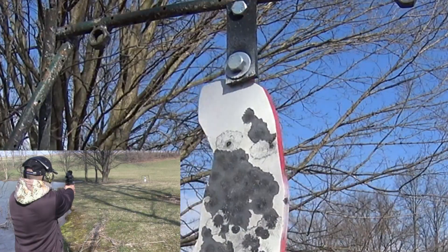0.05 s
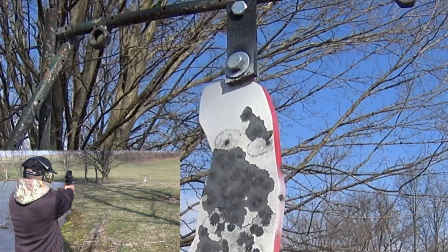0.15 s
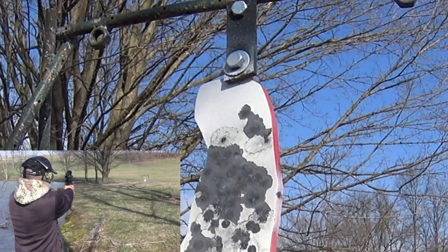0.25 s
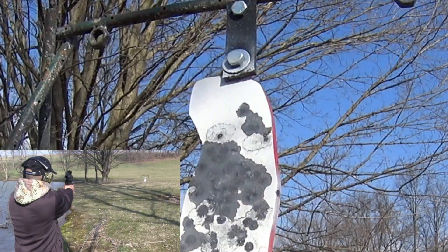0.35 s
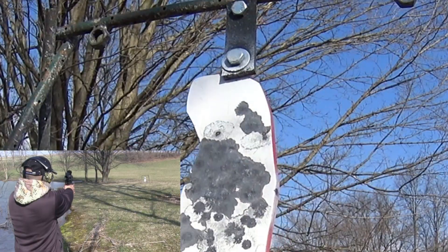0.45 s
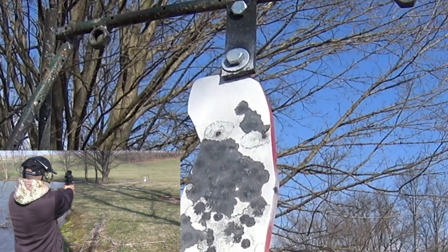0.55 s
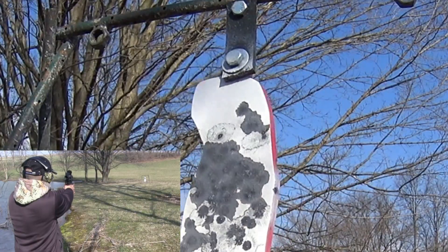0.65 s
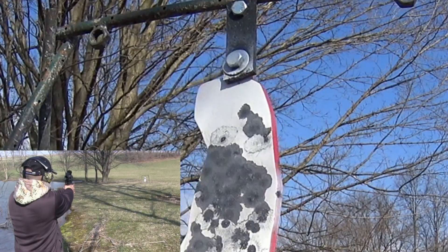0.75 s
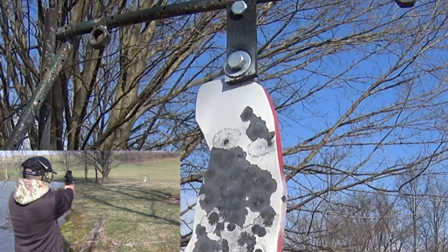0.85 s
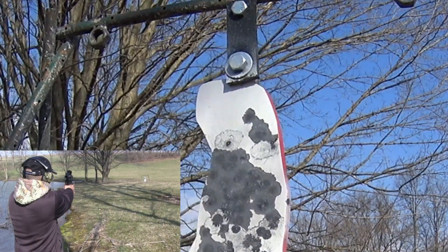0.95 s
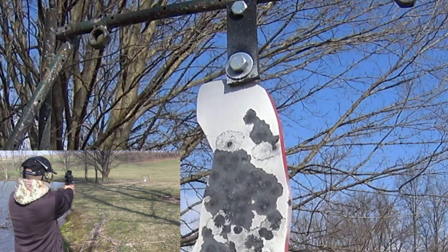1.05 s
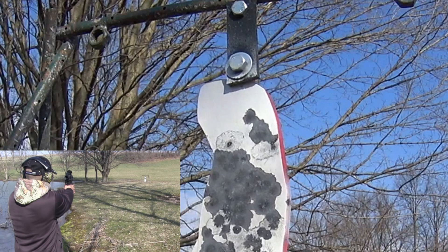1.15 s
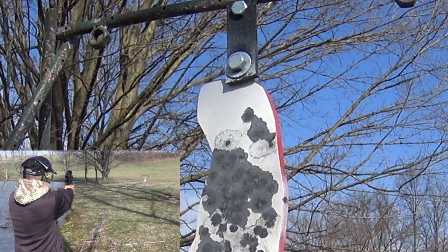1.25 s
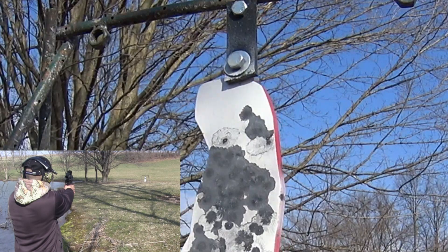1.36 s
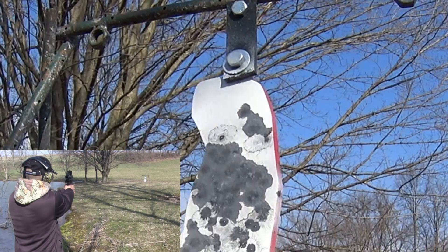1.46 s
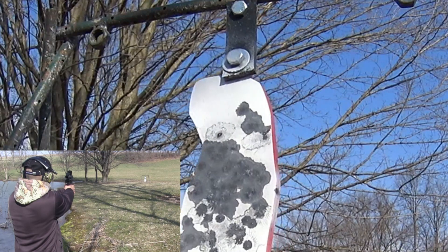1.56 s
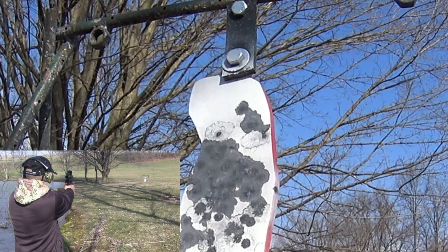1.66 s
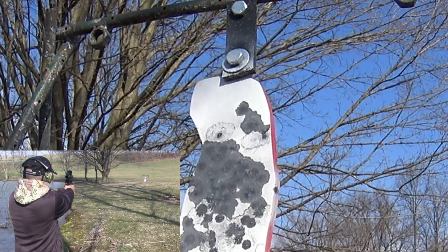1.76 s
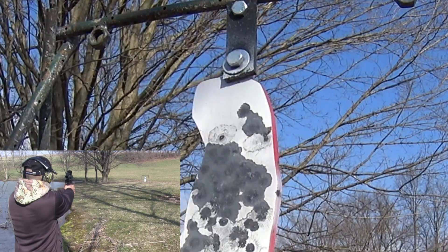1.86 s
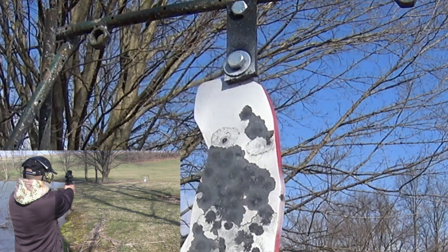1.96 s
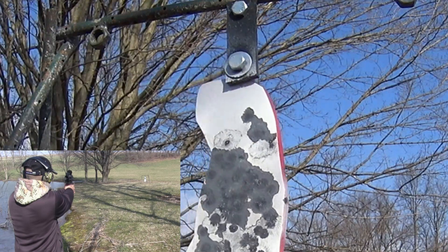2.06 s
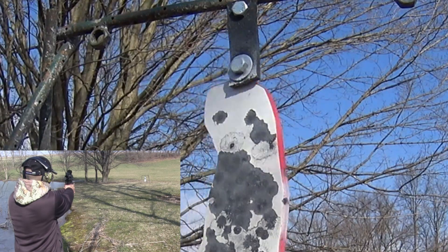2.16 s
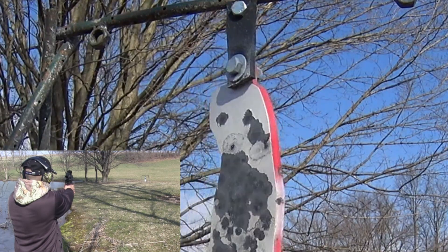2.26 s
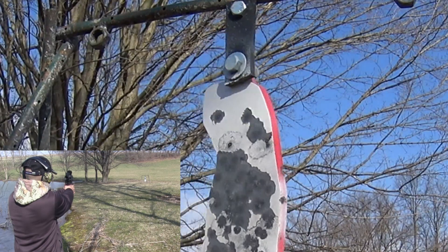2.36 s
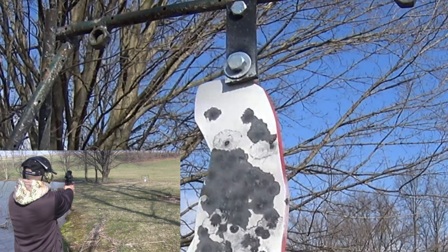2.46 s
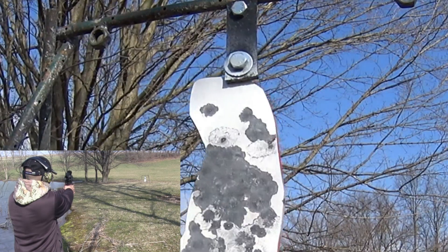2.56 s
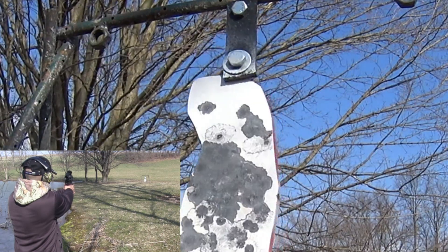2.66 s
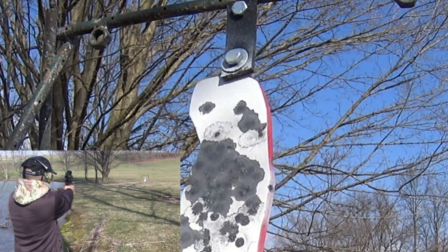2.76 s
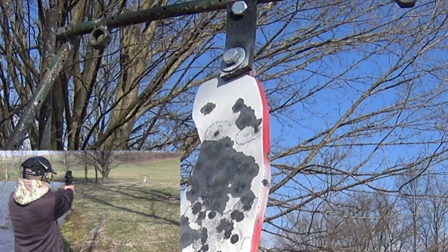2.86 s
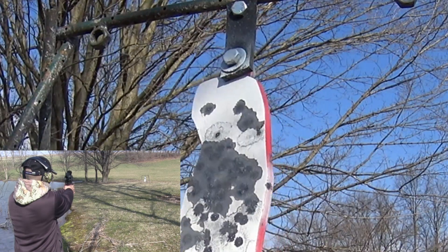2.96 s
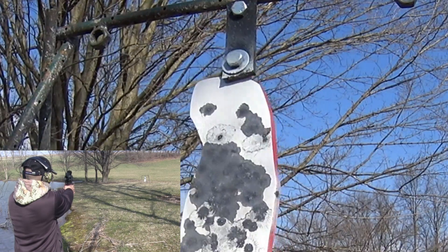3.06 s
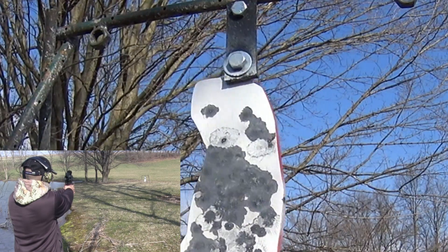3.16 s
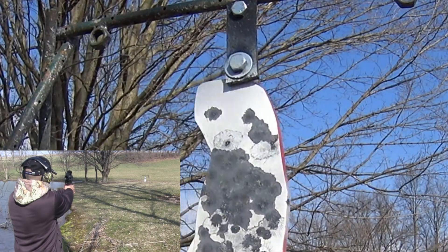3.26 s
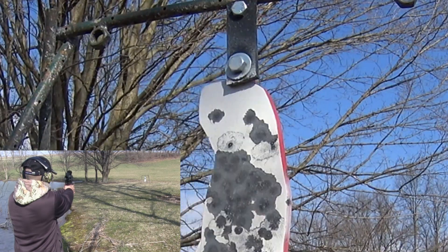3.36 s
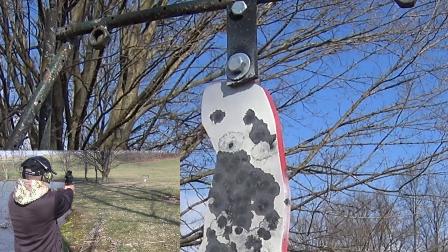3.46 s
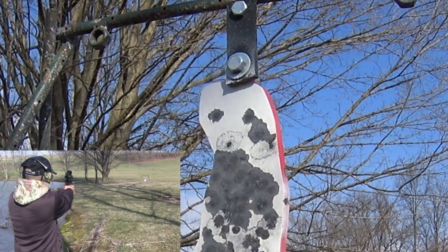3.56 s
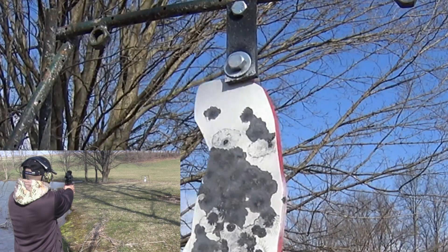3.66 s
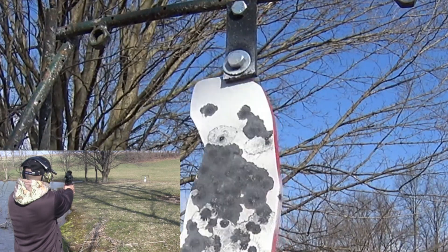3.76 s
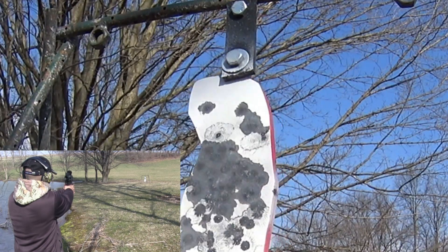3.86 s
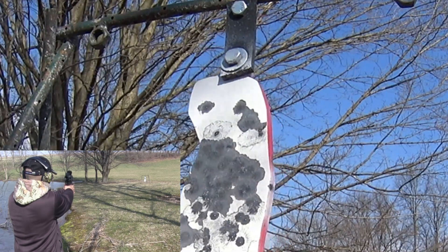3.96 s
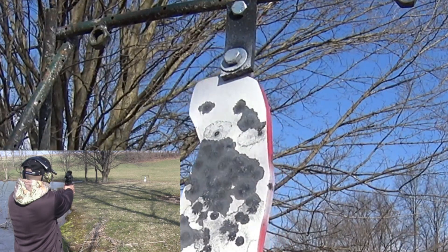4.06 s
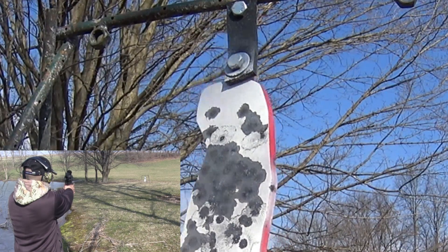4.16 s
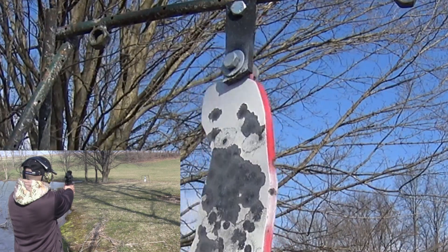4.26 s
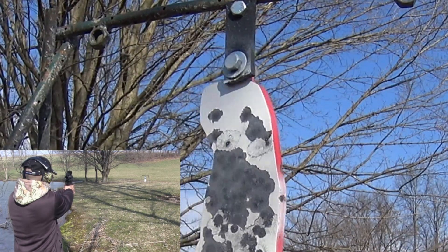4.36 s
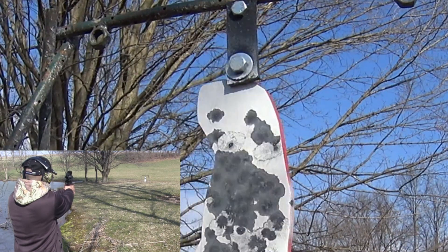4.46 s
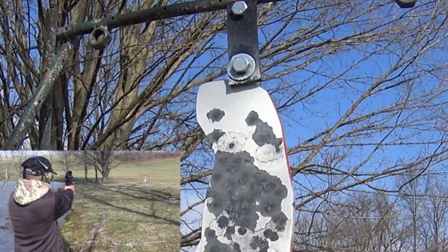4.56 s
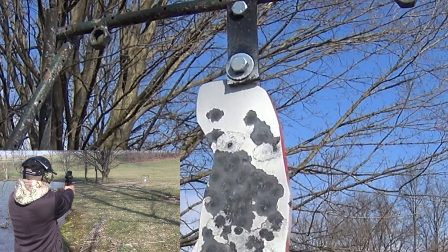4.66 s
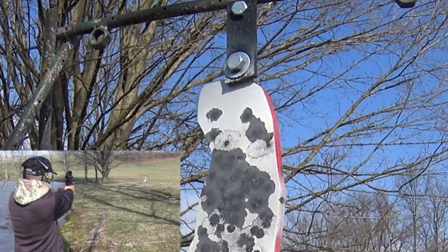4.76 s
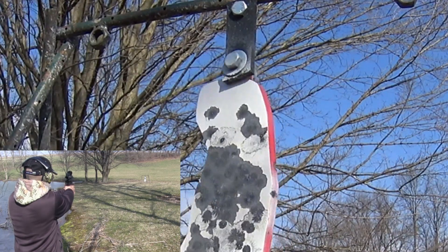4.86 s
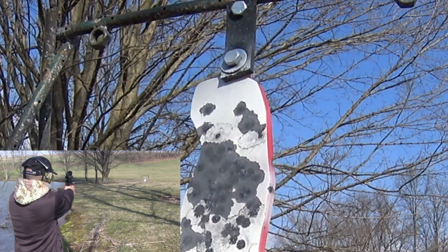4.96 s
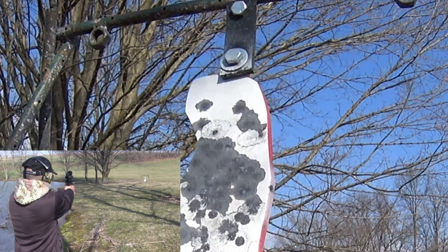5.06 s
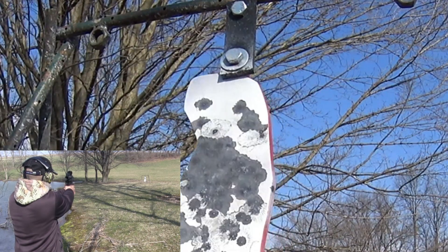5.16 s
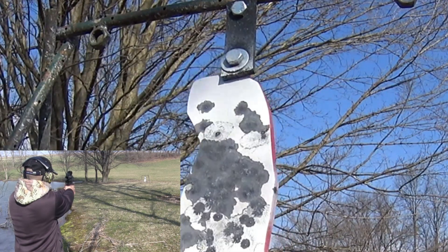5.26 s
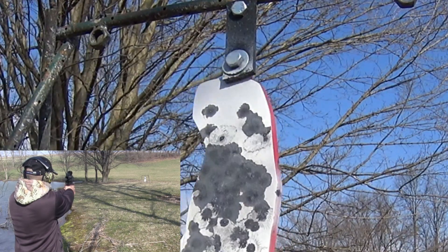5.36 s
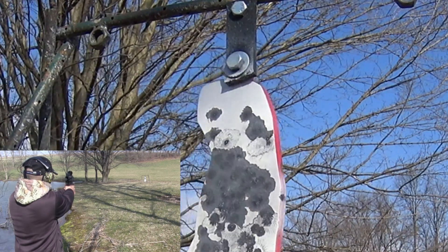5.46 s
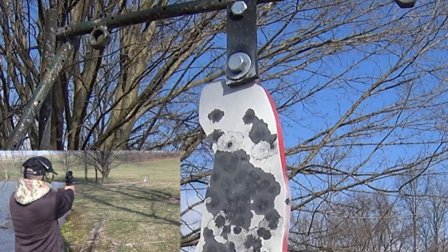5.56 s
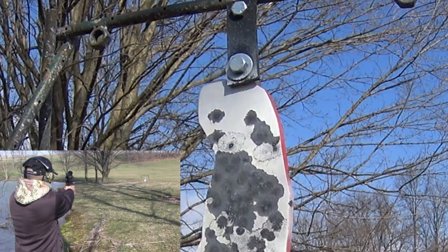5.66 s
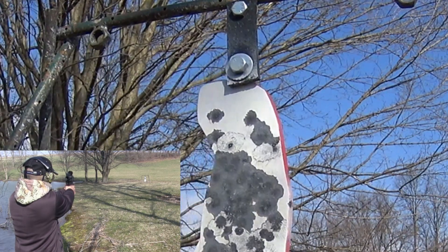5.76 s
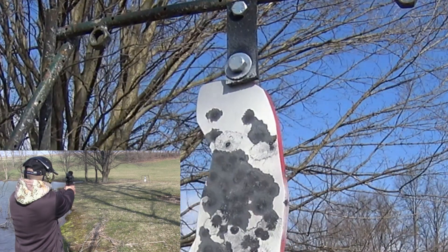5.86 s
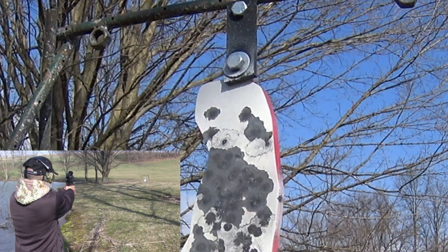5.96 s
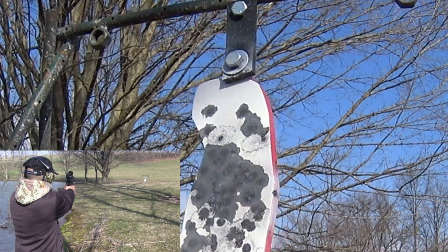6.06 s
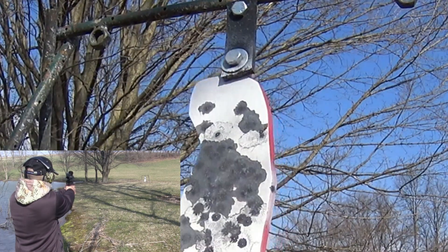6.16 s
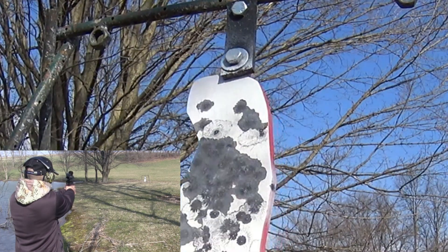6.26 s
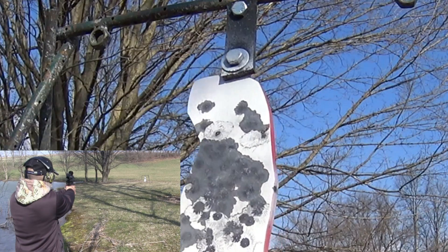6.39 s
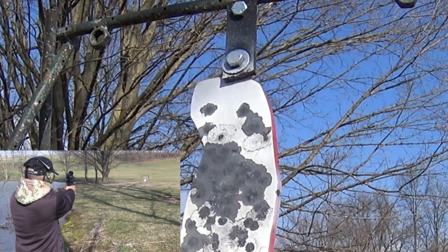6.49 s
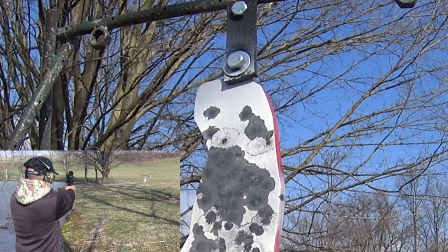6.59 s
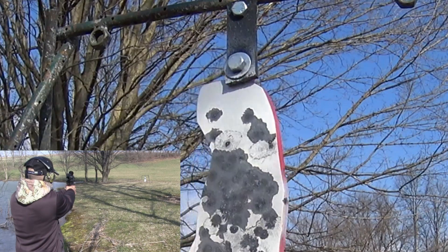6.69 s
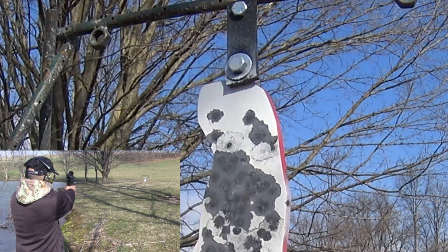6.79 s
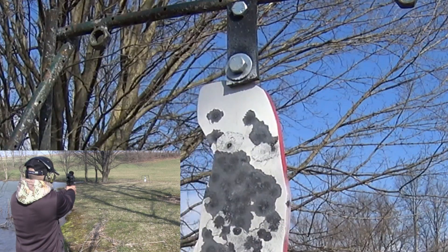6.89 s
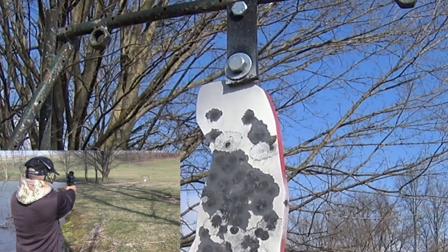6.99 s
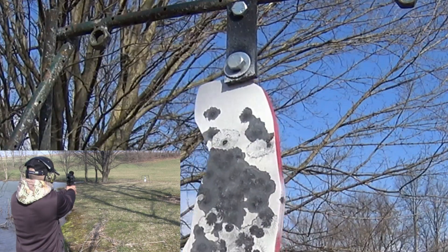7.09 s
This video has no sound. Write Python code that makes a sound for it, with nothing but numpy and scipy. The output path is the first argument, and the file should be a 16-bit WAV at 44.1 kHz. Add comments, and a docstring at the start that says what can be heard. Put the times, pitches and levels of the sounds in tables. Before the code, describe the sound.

Outdoors at a field edged by woods, a pistol shot is already ringing out on steel. Two more sharp cracks follow about two seconds apart, each with an almost immediate bright lead splat and short metallic ring, close to one microphone, plus a fainter late smack at the shooter. Echo washes back from trees. Quiet hush, a tiny bird chirp, then wind buffeting and cloth rustles near the end.

```python
"""Pistol shots at a hanging steel plate

A small-calibre pistol is fired at a steel plate across a field; the first shot is already ringing out.
A microphone at the plate hears the smack (shaped noise) and the ring (decaying modes), which swells as its
gain recovers and wavers as the plate twists. One at the shooter hears the blast, the late smack and the echo
of the woods, all bursts of shaped noise, with gusts of wind, a rustle of clothing, a bird and hissing twigs."""
import sys
import numpy as np
from scipy import signal
from scipy.fft import rfft, irfft, next_fast_len
from scipy.io import wavfile
from scipy.ndimage import uniform_filter1d

SR = 44100
rng = np.random.default_rng(int(sys.argv[2]) if len(sys.argv) > 2 else 0)


def dump(signal):
    """Clip the signal to [-1, 1] and save it as 16-bit WAV at the path in sys.argv[1]."""
    limited = np.clip(np.atleast_2d(signal).T, -1, 1)
    pcm = np.round(limited * 32767).astype(np.int16)
    wavfile.write(sys.argv[1], SR, pcm)


N = 314433
TIME = np.arange(N) / SR  # seconds from the start of the scene
AGE = TIME[:2 * SR]  # seconds from the start of one event

# Spectra have the columns hz, density_db (per Hz, relative); levels are those before gain control.
# shots: muzzle_s, blast_db, thump_db, wood_echo_db, impact_s, impact_db, shimmer_db,
# smack_s (arrival at the shooter), smack_db, bite_db (relative to the smack), far_ring_db
SHOTS = [(-.062, -8, -25, -42, -.04, -6, -35, .08, -45, -8, -66),
         (2.1864, 1.5, -24, -42.5, 2.2115, -9, -29, 2.3235, -17, -13, -44),
         (4.2019, 5.5, -7, -39.5, 4.2235, -5.5, -22, 4.3409, -12, -3, -34.5)]
# spectra of the blast, its scatter off the ground and its low thump: hz, density_db
BLAST_SPECTRUM = [(40, -30), (250, -22), (600, -22), (1300, -11), (2600, 1), (3600, -6), (6000, -16),
                  (15000, -30)]
GROUND_SPECTRUM = [(40, -32), (220, -21), (600, -21), (1600, -4), (2600, 0), (5000, -6), (9000, -11),
                   (15000, -16)]
THUMP_SPECTRUM = [(20, -36), (70, -24), (220, -5), (520, 0), (720, -7), (1100, -8), (1700, -9), (4000, -34)]
# spectra of the smack at the shooter and of its bright bite of lead on steel: hz, density_db
SMACK_SPECTRUM = [(200, -24), (1000, -19), (1800, -6), (2450, 0), (3200, -15), (7200, -17), (15000, -20)]
BITE_SPECTRUM = [(3900, -30), (4900, -4), (5700, 0), (7000, -28)]
# spectrum of the plate's ring as it reaches the shooter: hz, density_db
FAR_RING_SPECTRUM = [(300, -26), (1100, -8), (2400, 0), (5500, -5), (8000, -14), (11500, -19), (13500, -20),
                     (16000, -31)]
# the plate's highest modes, heard at the shooter: pitch_hz, peak_db (relative to the far ring)
HIGH_MODES = [(9790, -19), (10550, -18), (11500, -17), (13400, -16)]
# spectrum of the echo of the woods: hz, density_db
WOODS_SPECTRUM = [(200, -34), (600, -21), (1300, -3), (2400, 0), (3700, -5), (5700, -11), (8500, -19),
                  (14000, -32)]
# broad stands of trees and the gaps between them: echo_delay_s, level_db (over the scatter)
STANDS = [(.14, 3), (.28, 2.5), (.385, -4), (.44, 3), (.53, -3), (.58, 5.5), (.635, 3.5), (.705, 5.5),
          (.775, 6), (.9, 5.5), (1.04, 7.5), (1.14, 6)]
# spectra at the plate of the passing report, the lead splash and the weak modes: hz, density_db
CRACK_SPECTRUM = [(200, -14), (1000, -6), (2800, 0), (5000, -6), (8500, -8), (12500, -2), (16000, -6)]
SPLASH_SPECTRUM = [(150, -14), (700, -10), (2000, -2), (5000, 0), (7500, -3), (10000, -10), (15000, -17)]
SHIMMER_SPECTRUM = [(300, -26), (1100, -7), (2400, 0), (4000, -3), (5500, -4), (8000, -11), (11500, -17),
                    (15000, -29)]
# plate modes: pitch_hz, t60_s, rest_lobe_phase_rad, port_phase_rad (between the two ports),
# left_minus_right_db, hit_1_db, hit_2_db, hit_3_db
PLATE_MODES = [(815, 1.65, .8, .3, 0, -46, -41.5, -44), (3293, .52, 1.63, 1.4, -5, -17.5, -9, 4),
               (3869, .62, 1.87, .2, -1, -24, -35, -1), (4868, .34, 2.47, .5, -2, -39, -14, -17),
               (5375, .1, .21, .6, 0, -12, -13, -9), (6313, .1, 1.44, .6, 0, -12, 3, -6),
               (7099, .09, .11, .7, 0, -12, -7, -9), (7643, .7, 1.85, .62, -1, -24, -12.3, -7),
               (9269, .23, 2.4, 1.6, 0, -33, -12, -26)]
# the plate's twist after each hit: size_rad_per_khz (of lobe phase), rate_hz, start_angle_rad,
# lean_rad_per_khz, fill_ratio (share of the ring left between lobes)
TWISTS = [(.364, .678, -.4, -.668, .08), (.45, 1.44, -.09, 0, .08), (.08, 3.09, 2.62, 0, .1)]
# the breeze at the microphone: time_s, buffet_db (low), flutter_db (brighter)
BREEZE = [(0, -82, -85), (.35, -72, -74), (1.36, -82, -90), (1.49, -64, -86), (2.5, -59.5, -82),
          (3.1, -57, -71), (4.1, -54, -65), (4.45, -60, -55), (4.85, -61, -59), (5.05, -45, -55),
          (5.3, -42, -44), (5.48, -52, -64), (5.85, -48, -58), (6.06, -41, -49), (6.21, -53, -59),
          (6.4, -47, -56), (6.57, -58, -68), (7.13, -60, -56)]
# single gusts: peak_s, length_s, buffet_db, rumble_db
GUSTS = [(1.255, .05, -61, -57), (1.56, .16, -59, -57), (1.71, .18, -61, -60), (1.865, .11, -57, -61),
         (2.13, .12, -57, -55), (2.81, .08, -58, -56), (3.22, .1, -53, -60), (3.605, .04, -51, -66),
         (5.22, .11, -41, -64), (5.385, .04, -35, -58), (5.525, .07, -52, -47), (6.005, .13, -35.5, -54),
         (6.316, .09, -37, -62)]
# spectra of low buffeting, brighter flutter and the slow push of the wind: hz, density_db
BUFFET_SPECTRUM = [(15, -58), (25, -50), (80, -23), (130, -5), (200, 0), (300, -2.5), (420, -13),
                   (650, -30), (1500, -43), (4000, -64)]
FLUTTER_SPECTRUM = [(20, -40), (150, -15), (410, 0), (520, -3), (650, -10), (780, -10), (1400, -17),
                    (2600, -28), (5000, -54)]
RUMBLE_SPECTRUM = [(15, -42), (25, -30), (45, -10), (75, 0), (110, 1), (200, -15), (500, -40), (2000, -62)]
# eddies that strike the ports squarely: start_s, peak_db
KICKS = [(3.445, -38), (5.185, -31), (5.213, -27), (5.301, -28), (5.339, -22), (5.39, -24), (5.6, -33),
         (5.635, -32), (5.803, -31), (5.923, -27), (5.961, -27), (5.98, -25), (6.003, -19), (6.018, -20),
         (6.138, -26), (6.259, -35), (6.313, -24), (6.33, -22)]
# spectrum of the thud of one such eddy: hz, density_db
KICK_SPECTRUM = [(20, -62), (150, -11), (240, 0), (380, -4), (520, -7), (700, -25), (1600, -36),
                 (4000, -62)]
# catches of cloth and brief flutters of wind: start_s, length_s, level_db (before a 4 dB trim), brightest_hz
RUSTLES = [(.958, .02, -58, 2900), (2.114, .006, -54, 1000), (5.335, .007, -42, 1200),
           (5.928, .008, -53, 2900), (6.138, .014, -53, 2500), (6.308, .013, -45.5, 2650),
           (6.472, .018, -49, 1400), (6.601, .04, -52, 1500), (6.683, .006, -49, 1100),
           (6.749, .028, -44, 1800), (6.804, .053, -40, 2550), (6.78, .35, -52, 1600),
           (6.963, .005, -43.5, 3500), (6.972, .009, -49, 3200), (6.966, .016, -40.5, 950),
           (7.025, .012, -39, 900), (7.027, .018, -50, 3100)]
# a distant bird: start_s, pitch_hz (at the start), level_db (before a 2 dB trim)
CHIRPS = [(1.67, 4250, -70), (3.48, 4300, -69), (6.51, 4350, -68)]
# breeze in dry twigs and grass: time_s, level_db (before a 2 dB trim)
TWIG_LEVELS = [(0, -76), (3.4, -75), (4.8, -68), (5.35, -61), (5.9, -63), (6.5, -61), (7.13, -62)]
# spectra of the twigs and of the outdoor hush: hz, density_db
TWIG_SPECTRUM = [(500, -5), (2000, 2), (5500, 0), (10000, -5), (13000, -2), (16000, -5)]
HUSH_SPECTRUM = [(25, -2), (140, -1), (330, -13), (1000, -2), (2000, -4), (3500, -9), (6000, -15),
                 (10000, -20), (13000, -18), (16000, -20)]

GROUND_DB, GROUND_T60_S = -17, .12  # blast scattered by the ground, relative to the blast
STAND_SPREAD_S = .021  # how long one stand of trees echoes
EDDY_PER_S, EDDY_DB = 70, 2.2  # quick unevenness of the wind
GUST_FLUTTER_DB, FLUTTER_GROWTH = 8, 1.5  # flutter of a full-scale gust; dB gained per dB of buffeting
RUMBLE_DB, RUMBLE_GROWTH = -53, .27  # the same for the rumble of the breeze
RUSTLE_ATTACK_S, RUSTLE_RELEASE_S = .002, .005  # each starts quickly and lets go a little slower
CRACKLE_PER_S, CRACKLE_DB = 700, 3.5  # crackly unevenness within each rustle or flutter
BODY_LOSS_DB, BODY_S = -14, .018  # brief ones lack the low body of longer rustles
LIMIT_DB, RECOVER_S, CEILING_DB = -13, .09, -9  # gain control and overload of the shooter's microphone
COPY_DELAY_S = .003775
TOP_HZ = 16500


def gunfire():
    """Impulse, scattering and delay: blast and thump, ground and woods, then the hit a field's width later."""
    out = np.zeros((2, N))
    for muzzle_s, blast_db, thump_db, echo_db, *_, smack_s, smack_db, bite_db, ring_db in SHOTS:
        blast = snap(BLAST_SPECTRUM, t60=.017, side_db=-28)
        ground = undb(GROUND_DB) * burst(GROUND_SPECTRUM, t60=GROUND_T60_S, side_db=-20)
        add(out, muzzle_s, undb(blast_db) * (blast + ground))
        add(out, muzzle_s, undb(thump_db) * snap(THUMP_SPECTRUM, t60=.045, side_db=-26))
        add(out, muzzle_s, undb(echo_db) * wood_echo())
        smack = snap(SMACK_SPECTRUM, t60=.009, side_db=-18)
        bite = undb(bite_db) * snap(BITE_SPECTRUM, t60=.009, side_db=-18)
        add(out, smack_s, undb(smack_db) * (smack + bite))
        add(out, smack_s, undb(ring_db) * far_ring())
    return out


def far_ring():
    """Modal density: across the field the plate is a dense shimmer topped by a few thin partials."""
    partials = 0
    for hz, db in HIGH_MODES:
        partials = partials + undb(db) * np.sin(2 * np.pi * (hz * AGE + rng.random()))
    return burst(FAR_RING_SPECTRUM, t60=.7, side_db=-10) + partials * fade(.6)


def wood_echo():
    """Scattering and absorption: trunks return uneven clumps, and longer air paths take more treble."""
    clumps_db = sum(db * np.exp(-((AGE - delay) / STAND_SPREAD_S) ** 2) for delay, db in STANDS)
    uneven_db = 1.6 * walk(110, len(AGE)) + 2.2 * walk(900, len(AGE))
    scatter = wide(WOODS_SPECTRUM, len(AGE), side_db=-10) * undb(clumps_db + uneven_db)
    hz, s, bands = signal.stft(scatter, SR, nperseg=2 ** 8)
    loss_db = s * (11 + .004 * hz[:, None]) + 3.3 * s ** 2
    echo = signal.istft(bands * undb(-loss_db), SR)[1][:, :len(AGE)]
    return echo * (1 - np.exp(-AGE / .13))  # the echo builds up gradually


def at_the_plate():
    """Impact excitation: the report cracks past, then lead splashes on the steel and sets it ringing."""
    out = np.zeros((2, N))
    for hit, (muzzle_s, _, _, _, impact_s, impact_db, shimmer_db, *_) in enumerate(SHOTS):
        crack = undb(-17.5) * snap(CRACK_SPECTRUM, t60=.012, side_db=-18)
        crack_tail = undb(-26) * burst(CRACK_SPECTRUM, t60=.16, side_db=-15)
        add(out, muzzle_s + .004, crack + crack_tail)
        splash = undb(impact_db) * burst(SPLASH_SPECTRUM, t60=.1, side_db=-10)
        # the plate's many weak modes
        shimmer = undb(shimmer_db) * burst(SHIMMER_SPECTRUM, t60=.6, side_db=-5)
        struck = splash + shimmer + plate_ring(hit)
        add(out, impact_s, undb(5.3) * gain_control(struck, limit_db=-28, recover_s=.22))
    return out


def plate_ring(hit):
    """Modal directivity: modes beam in lobes, finer with pitch; twisting sweeps them past the microphone."""
    size, rate, start, lean, fill = TWISTS[hit]
    twist = lean + size * np.sin(2 * np.pi * rate * AGE + start) * np.exp(-AGE / 1.5)
    ring = 0
    for hz, t60, rest, port, pan_db, *hit_db in PLATE_MODES:
        lobe = hz / 1000 * twist + rest
        beam = np.cos(lobe) + fill * 1j * np.sin(lobe)  # the nulls between lobes are never quite empty
        vibration = np.exp(2j * np.pi * (hz * AGE + rng.random())) * fade(t60)
        wave = beam * vibration * undb(hit_db[hit])
        port_gain = undb(np.array([[pan_db], [-pan_db]]) / 2)
        ports = port_gain * np.exp(1j * np.array([[0], [port]]))
        ring = ring + np.sqrt(2) * np.real(ports * wave)
    return ring * (1 - np.exp(-AGE / .006))


def wind():
    """Turbulence: eddies buffet the ports over a rumble that grows with the breeze; strong gusts flutter."""
    times, buffet_db, flutter_db = np.transpose(BREEZE)
    breeze = undb(np.interp(TIME, times, buffet_db))
    breeze_flutter = undb(np.interp(TIME, times, flutter_db))
    gusts, push = np.zeros(N), np.zeros(N)
    for s, length, db, rumble_db in GUSTS:
        add(gusts, s - length / 2, undb(db) * swell(length))
        add(push, s - length / 2, undb(rumble_db) * swell(length))
    eddies = undb(EDDY_DB * walk(EDDY_PER_S, N))
    buffet = eddies * np.hypot(breeze, gusts)
    gust_flutter = undb(GUST_FLUTTER_DB) * gusts ** FLUTTER_GROWTH
    flutter = eddies * np.hypot(breeze_flutter, gust_flutter)
    breeze_rumble = undb(RUMBLE_DB + 2.5 * walk(16, N)) * breeze ** RUMBLE_GROWTH
    rumble = np.hypot(breeze_rumble, push)
    return (buffet * wide(BUFFET_SPECTRUM, N, side_db=-24)
            + flutter * wide(FLUTTER_SPECTRUM, N, side_db=-20)
            + rumble * wide(RUMBLE_SPECTRUM, N, side_db=-14))


def kicks():
    """Impulse response: the hardest eddies land as single thuds."""
    out, thud = np.zeros(N), click(KICK_SPECTRUM)
    for s, db in KICKS:
        add(out, s, undb(db) * thud)
    return out


def rustles():
    """Friction and turbulence: catches of cloth and brief flutters of wind, each a broad hiss around a pitch."""
    out = np.zeros((2, N))
    for s, length, db, hz in RUSTLES:
        age = AGE[:int((length + RUSTLE_RELEASE_S) * SR)]
        attack = np.minimum(age / RUSTLE_ATTACK_S, 1)
        release = np.minimum(age[::-1] / RUSTLE_RELEASE_S, 1)
        body_db = BODY_LOSS_DB * np.exp(-length / BODY_S)
        tone = [(hz / 12, body_db - 16), (hz / 4, body_db - 1), (hz * .7, body_db),
                (hz, 0), (hz * 1.3, -7), (hz * 2.1, -25), (hz * 5, -50)]
        crackle = undb(CRACKLE_DB * walk(CRACKLE_PER_S, len(age)))
        hiss = wide(tone, len(age), side_db=-14)
        add(out, s, undb(db - 4) * attack * release * crackle * hiss)
    return out


def bird():
    """Frequency modulation: short, wavering, falling chirps from the trees."""
    out = np.zeros(N)
    for s, hz, db in CHIRPS:
        shape = swell(.09)
        fall = .025 * np.linspace(0, 1, len(shape))
        waver = .025 * walk(300, len(shape))
        pitch = hz * (1 - fall + waver)
        add(out, s, undb(db - 2) * shape * np.sin(2 * np.pi * np.cumsum(pitch) / SR))
    return out


def field():
    """Ambient noise: a distant outdoor hush, and twigs hissing as the breeze gets up."""
    hush = wide(HUSH_SPECTRUM, N, side_db=-9) * undb(-64 + .7 * walk(4, N))
    twig_db = np.interp(TIME, *np.transpose(TWIG_LEVELS)) - 2 + 1.2 * walk(25, N)
    return hush + wide(TWIG_SPECTRUM, N, side_db=-3) * undb(twig_db)


def gain_control(x, limit_db, recover_s):
    """Compression: duck at once by the excess over the limit; the cut in dB then relaxes exponentially."""
    power = uniform_filter1d(np.mean(x ** 2, axis=0), size=128)
    excess = np.maximum(10 * np.log10(np.abs(power) + 1e-12) - limit_db, 1e-12)
    elapsed = TIME[:len(power)] / recover_s
    # in logarithms the relaxation is a straight line, so a running maximum holds the largest cut
    cut_db = np.exp(np.maximum.accumulate(np.log(excess) + elapsed) - elapsed)
    return x * undb(-cut_db)


def snap(spectrum, t60, side_db):
    """Fixed magnitude, random phase: a very short burst of constant colour and strength."""
    phases = np.exp(1j * np.angle(rfft(burst(spectrum, t60, side_db))))
    even = irfft(phases * colour(spectrum, len(AGE)), len(AGE)) * fade(10 * t60)
    return even * fade(t60).std() / even.std()


def burst(spectrum, t60, side_db):
    """Damping: stereo noise that dies away from a blow."""
    size = min(int(1.5 * t60 * SR), len(AGE))
    hiss = wide(spectrum, size, side_db)
    return np.pad(hiss, ((0, 0), (0, len(AGE) - size))) * fade(t60)


def click(spectrum):
    """Minimum phase: one sharp push of peak 1 that rings with the given colour."""
    cepstrum = irfft(np.log(colour(spectrum, len(AGE))))
    x = irfft(np.exp(rfft(2 * cepstrum[:len(cepstrum) // 2], len(cepstrum))))
    return x / np.abs(x).max()


def wide(spectrum, size, side_db):
    """Mid and side: a common noise and an independent opposed one at side_db."""
    side = noise(spectrum, size) * np.array([[1], [-1]])
    return noise(spectrum, size) + undb(side_db) * side


def noise(spectrum, size):
    """Spectral shaping: random noise of rms near 1 with the given colour."""
    padded = next_fast_len(size, True)
    x = irfft(rfft(rng.standard_normal(padded)) * colour(spectrum, padded), padded)
    return x[:size] / x.std()


def colour(spectrum, size):
    """Frequency response: the gain of a spectrum at each frequency bin of a sound of this size."""
    hz, db = np.transpose(spectrum)
    bins = np.maximum(np.fft.rfftfreq(size, 1 / SR), 1)
    return undb(np.interp(np.log(bins), np.log(hz), db))


def walk(rate, size):
    """Random modulation: chance values, rate per second, joined by lines and scaled to spread 1."""
    steps = np.arange(size) * rate / SR
    count = int(steps[-1]) + 2
    x = np.interp(steps, np.arange(count), rng.standard_normal(count))
    return x / x.std()


def swell(length):
    """Envelope: a rounded burst of rms near 1, length in seconds."""
    return np.sqrt(2 * np.hanning(int(length * SR)))


def fade(t60):
    """Exponential damping: a decay of 60 dB in t60 seconds."""
    return np.exp(-np.log(1000) * AGE / t60)


def undb(db):
    """Logarithmic level: decibels to amplitude gain."""
    return 10 ** (np.asarray(db) / 20)


def add(track, s, sound):
    """Superposition: mix a sound into a track from time s on."""
    start = int(round(s * SR))
    first, last = max(start, 0), min(start + sound.shape[-1], N)
    track[..., first:last] += sound[..., first - start:last - start]


def scene():
    """Comb filtering: the shooter's side ducks, overloads and is mixed with its own copy 3.8 ms later."""
    near = gunfire() + wind() + kicks() + rustles() + bird() + field()
    near = gain_control(near, limit_db=LIMIT_DB, recover_s=RECOVER_S)
    near = undb(CEILING_DB) * np.tanh(near / undb(CEILING_DB))
    out = near + at_the_plate()
    add(out, COPY_DELAY_S, .6 * near)  # hollows the tone of the shooter's microphone
    return out


def record(dry):
    """Band limiting: the recorder cuts the top with a steep low-pass filter."""
    return signal.sosfilt(signal.ellip(8, .2, 70, TOP_HZ, fs=SR, output="sos"), dry)


dry = scene()
out = record(dry)
dump(out)
```